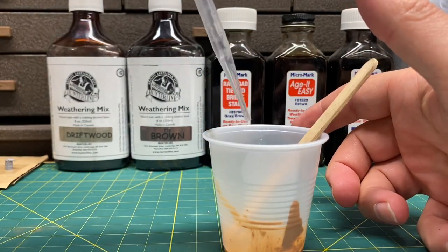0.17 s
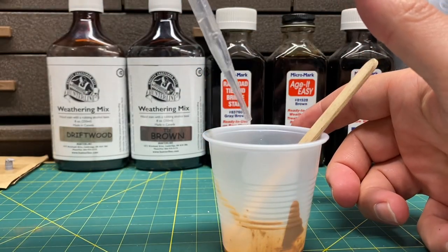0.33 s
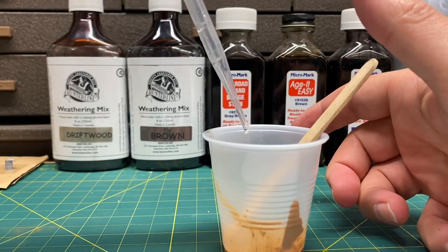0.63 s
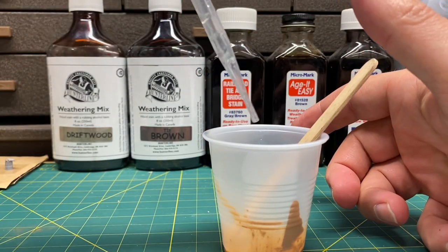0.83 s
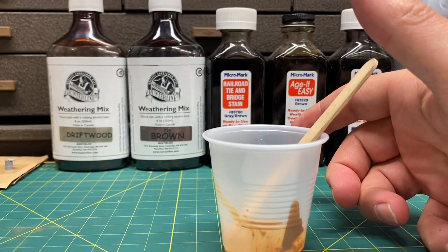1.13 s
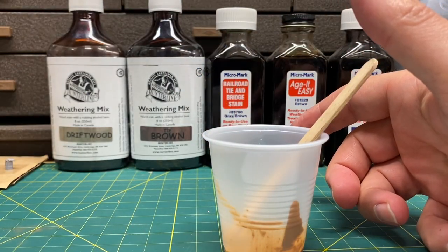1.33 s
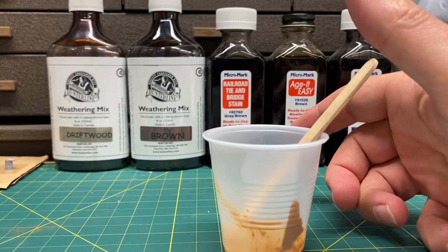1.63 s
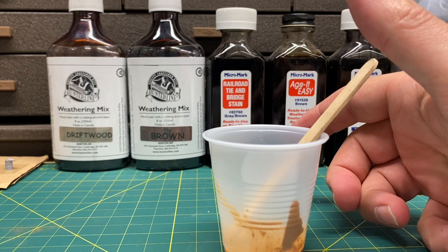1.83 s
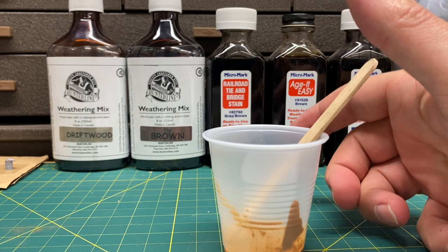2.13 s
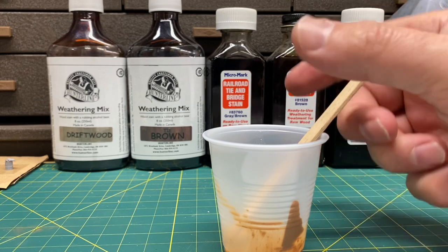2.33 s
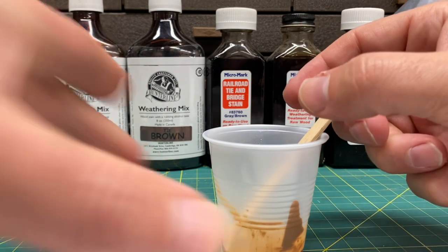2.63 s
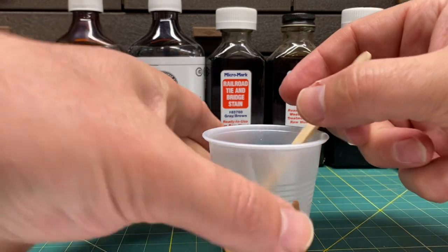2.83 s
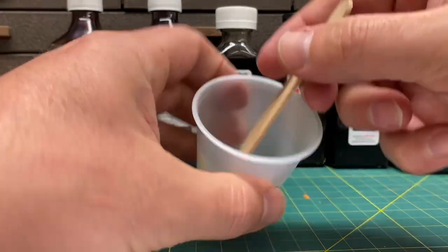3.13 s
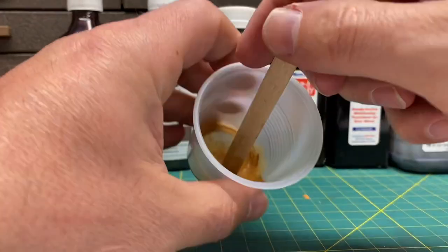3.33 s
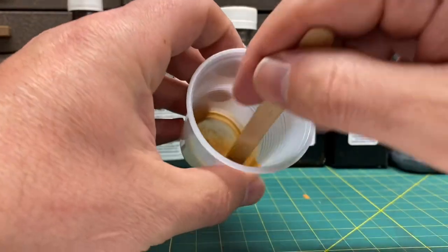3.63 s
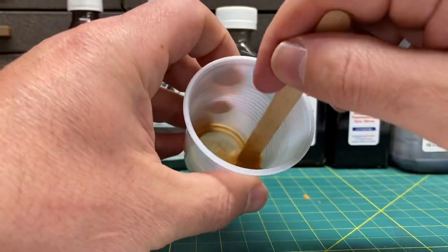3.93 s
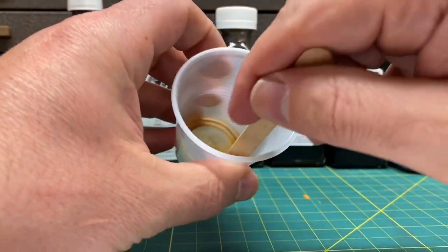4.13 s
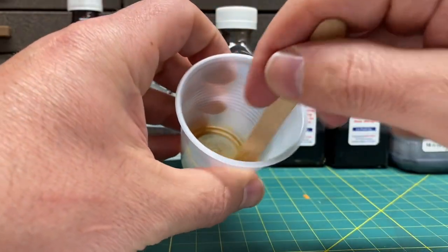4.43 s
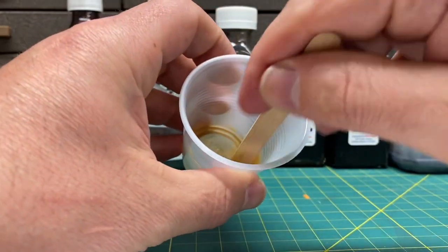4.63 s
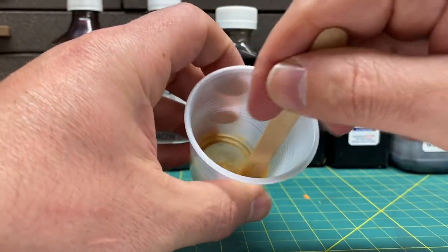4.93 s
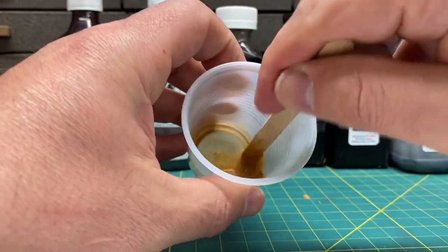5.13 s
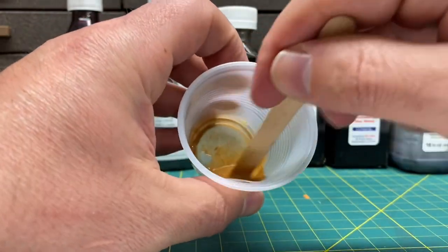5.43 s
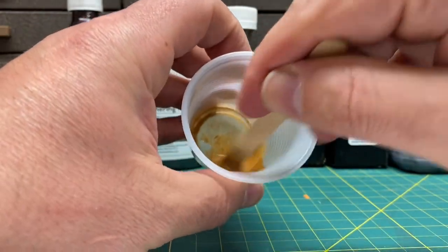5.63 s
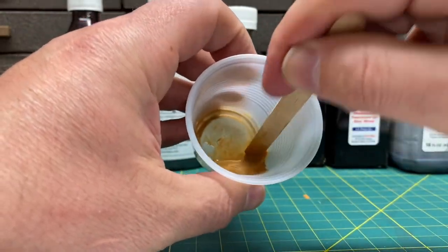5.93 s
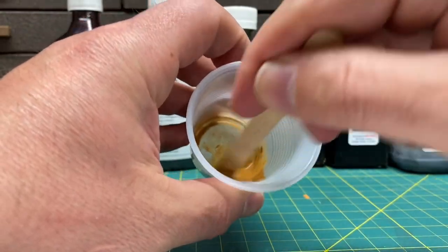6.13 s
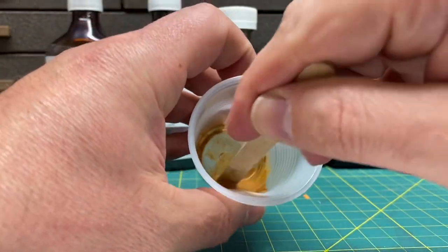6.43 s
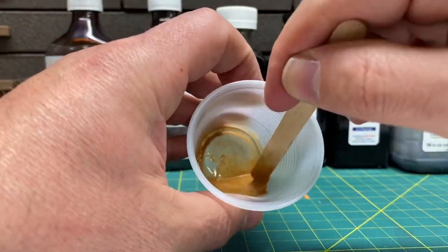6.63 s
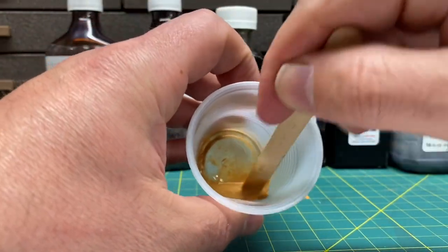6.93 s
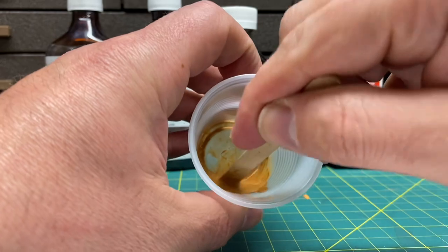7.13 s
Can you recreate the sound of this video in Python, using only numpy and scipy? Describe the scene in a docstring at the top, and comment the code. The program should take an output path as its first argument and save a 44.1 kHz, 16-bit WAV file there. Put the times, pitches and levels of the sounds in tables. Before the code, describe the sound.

A pipette drips and is set down, then a wooden stick scrapes and clicks around a thin plastic cup of paint over a low hum.

```python
"""Stirring paint in a plastic cup

A pipette drips, each drop ringing as a small bubble, and rattles as it is laid on the workbench.
Fingers slide on a thin plastic cup, then a flat wooden stick stirs the watery paint in it, rubbing
along the bottom in gritty strokes and skipping over the ribs of the wall, all close to a phone.
Underneath, a transformer hums at twice the mains frequency over the rumble of the house."""
import sys
import numpy as np
from scipy import signal
from scipy.fft import rfft, irfft, next_fast_len
from scipy.io import wavfile
from scipy.ndimage import uniform_filter1d, map_coordinates

SR = 44100
rng = np.random.default_rng(int(sys.argv[2]) if len(sys.argv) > 2 else 0)


def to_wav(s):
    """Save 16-bit WAV."""
    ch = np.atleast_2d(s).T  # columns
    pcm = np.round(np.clip(ch, -1, 1) * 32767)  # PCM
    wavfile.write(sys.argv[1], SR, pcm.astype(np.int16))


N = 320607

# The transformer's hum and a faint tone above it. Each row: pitch in Hz, rms level in dB.
HUM_TONES = [(119.93, -32.3), (269, -67)]
# The fader ride of the low drone. Each row: time in seconds, level in dB.
DRONE_RIDE = [(0.05, -47.5), (1.54, -58.5), (1.84, -31.5), (2.18, -53), (2.9, -46.5), (3.02, -54),
              (3.18, -48), (3.61, -49), (4.23, -40.5), (4.49, -57), (4.61, -40), (4.81, -54), (5.74, -59),
              (5.98, -45), (6.1, -67), (6.26, -47), (6.4, -65), (7.08, -49)]
# The tone colour of the house rumble. Each row: frequency in Hz, relative level in dB.
RUMBLE_SPECTRUM = [(20, -32.5), (35, -17.5), (55, -10.5), (75, -11), (98, 0), (115, -1), (135, -5),
                   (160, -7.5), (185, -28), (225, -20.5), (270, -27.5), (320, -31.5), (550, -38),
                   (800, -54.5), (1200, -59), (4000, -67), (12000, -72), (14000, -78), (16000, -88.5)]
# How centred the rumble sits. Each row: frequency in Hz, left-right correlation (1 is mono).
RUMBLE_LIKENESS = [(100, 0.98), (300, 0.95), (600, 0.15), (1200, 0.081), (16000, 0.18)]
# Drops from the pipette. Each row: start in seconds, relative peak in dB, spit over that peak in dB.
DROPS = [(0.0102, -38, -29), (0.0214, -63, -39), (0.0275, -60, -29), (0.0496, -55.5, -45.5),
         (0.131, -70, -38), (0.5033, -52, -17), (0.5163, -38, -16), (0.5266, -46.5, -26.5),
         (0.5431, -44, -18), (0.559, -47, -27.5), (0.5721, -50, -21), (0.605, -53, -20.5),
         (0.627, -62.5, -36), (0.6444, -68, -30), (0.6694, -70, -32)]
# The pipette meets the bench. Each row: start in seconds, relative peak in dB, favoured pitch in Hz.
PIPETTE_TAPS = [(0.872, -68.5, 3190), (1.225, -70.5, 800), (1.752, -67, 800), (1.848, -70, 6470),
                (1.886, -42, 1495), (1.914, -50, 2400), (1.948, -58, 3200), (1.96, -45, 6500),
                (1.964, -50, 800), (2.034, -44, 1850), (2.051, -52, 800), (2.094, -57.5, 1500),
                (2.203, -61, 2400), (2.35, -65.5, 3200)]
# The ring of the pipette's tube. Each row: pitch in Hz, width in Hz, gain in dB.
TUBE_MODES = [(796, 150, -0.5), (1522, 32, 5.5), (1850, 24, 1), (2530, 66, -2), (3240, 79, -4),
              (4120, 180, -2.5), (5300, 96, -11), (6600, 300, -12), (7800, 350, -9.5)]
# The colour of skin on plastic. Each row: centre in Hz, width in Hz, gain in dB.
SKIN_BANDS = [(1200, 790, 1.5), (2400, 1700, -0.5), (5040, 2100, -1), (6130, 1200, 1.5)]
# Fingers slide on stick and cup. Each row: start and stop in seconds, relative level in dB,
# swell in dB, fade in dB per second, sizzle over the rub in dB.
GRIPS = [(2.479, 2.518, -68.5, 9.5, 250, -4), (2.544, 2.698, -73, 3.5, 403, -15.5),
         (2.818, 2.869, -65.5, 2, 304, -5), (2.864, 2.881, -60, 4.5, 300, -5),
         (2.884, 2.97, -52.5, -11, 799.5, -5), (3.004, 3.042, -59.5, -11.5, 123, 1),
         (3.149, 3.241, -66, -7, 200, 5.5)]
# The stick skips and knocks. Each row: time in seconds, relative knock peak in dB,
# relative tick level in dB, knock pitch in Hz.
SKIPS = [(2.517, -76, -50.5, 431), (2.822, -40, -39.5, 1910), (2.861, -57, -52, 393),
         (2.883, -55, -41, 463), (3.007, -30, -53.5, 760), (3.236, -55, -67, 594), (3.351, -43, -62, 402),
         (3.51, -50, -45.5, 528), (3.525, -34, -40.5, 574), (3.563, -24, -54, 706), (3.577, -21, -39, 1100),
         (3.585, -22.5, -43, 676), (3.614, -24, -40, 940), (3.779, -38, -36.5, 1300),
         (3.827, -44, -49, 966), (3.86, -30.5, -40.5, 920), (3.878, -39, -41, 500), (3.973, -47, -39, 786),
         (3.986, -30, -39, 770), (4.012, -29, -49, 696), (4.076, -35.5, -46.5, 1220),
         (4.116, -27, -36, 1410), (4.263, -51, -38.5, 1260), (4.29, -29.5, -39, 1220),
         (4.304, -27, -32.5, 1220), (4.325, -53, -41, 436), (4.341, -47, -37.5, 382),
         (4.37, -40, -36.5, 1260), (4.406, -33.5, -33.5, 990), (4.416, -29, -44, 960),
         (4.432, -29.5, -31, 870), (4.448, -25, -36, 1340), (4.472, -23.5, -29.5, 980),
         (4.513, -21.5, -40.5, 1050), (4.572, -39, -51.5, 507), (4.613, -33, -40.5, 1290),
         (4.794, -42.5, -37.5, 845), (4.814, -33, -42, 1210), (4.862, -42, -40.5, 1210),
         (4.92, -25.5, -40.5, 680), (4.928, -20.5, -38, 1090), (4.941, -27, -37.5, 620),
         (4.952, -26, -37, 1380), (4.969, -28, -33.5, 795), (5.065, -28.5, -27.5, 775),
         (5.151, -51, -43.5, 615), (5.167, -37, -36.5, 1120), (5.177, -31, -36, 1130),
         (5.33, -46, -35.5, 605), (5.351, -58, -48.5, 724), (5.387, -48, -46.5, 533),
         (5.403, -52, -45, 500), (5.413, -57, -46.5, 500), (5.423, -44, -46, 401), (5.434, -45, -48.5, 500),
         (5.452, -43.5, -55.5, 497), (5.541, -40, -45, 414), (5.579, -47, -46, 483), (5.605, -47, -49, 500),
         (5.678, -42.5, -50.5, 780), (5.754, -39, -40, 1100), (5.81, -52, -49, 500), (5.823, -52, -60, 500),
         (5.88, -44, -46, 420), (5.91, -34.5, -47.5, 670), (5.926, -34, -47.5, 485),
         (6.027, -36.5, -58.5, 630), (6.05, -39, -43, 1200), (6.187, -38, -51.5, 460),
         (6.322, -32.5, -53, 1190), (6.354, -29.5, -49, 570), (6.37, -29.5, -45.5, 865),
         (6.397, -34, -53.5, 626), (6.438, -46, -39, 603), (6.661, -32.5, -56, 414),
         (6.735, -23.5, -49.5, 500), (6.793, -35.5, -43, 710), (6.97, -28, -59, 720),
         (6.985, -17, -40.5, 1050), (7.006, -23.5, -47.5, 820), (7.042, -40, -53.5, 1180),
         (7.064, -29, -49, 1080), (7.074, -22, -37, 590), (7.116, -28, -43, 1210)]
# A faint rasp as the cup tilts. Each row: start and stop in seconds, relative level in dB,
# swell in dB, fade in dB per second.
TILT_RASPS = [(3.235, 3.5, -70, 1, 1000)]
# The colour of that rasp. Each row: centre in Hz, width in Hz, gain in dB.
RASP_BAND = [(1670, 420, 0)]
# Stirring strokes. Each row: start and turn of the stick in seconds, relative hiss level in dB,
# swell in dB, fade in dB per second, cup body over the hiss in dB, sizzle over the hiss in dB.
STROKES = [(3.349, 3.364, -61.5, 1, 300, 9, 0.5), (3.505, 3.54, -48, 0.5, 298, 5.5, -7.5),
           (3.542, 3.598, -54.5, -2.5, 1500, 13.5, -4.5), (3.613, 3.644, -50, -7.5, 900, 8, -6.5),
           (3.714, 3.851, -55.5, 3, 600, 3, -0.5), (3.972, 3.991, -52.5, 1.5, 2002, 11, -5),
           (4.015, 4.149, -59, 6.5, 500, 3.5, -2), (4.171, 4.168, -53.5, 1.5, 900, -0.5, -6),
           (4.259, 4.416, -53, -3, 1997, 5.5, -1.5), (4.508, 4.515, -49, 8.5, 1802.5, 7.5, -5.5),
           (4.58, 4.59, -55, -5, 298, 7, -5), (4.598, 4.622, -50.5, 7, 547, 3, -5.5),
           (4.75, 4.913, -55, -2.5, 1999, 6.5, -2), (5.067, 5.206, -57, 6, 703, 3.5, -2.5),
           (5.288, 5.393, -55.5, -0.5, 353, 6.5, -4), (5.487, 5.578, -58, 2.5, 344.5, 5.5, -0.5),
           (5.675, 5.73, -56, -1, 200, 6, -1), (5.738, 5.774, -50, 0, 197.5, 4.5, -3),
           (5.87, 5.899, -52.5, -1.5, 200, 3.5, -5), (5.905, 5.975, -55, -0.5, 150, 7.5, -4),
           (6.047, 6.187, -53.5, -0.5, 200, 2, -1.5), (6.24, 6.31, -57, -1, 200, 0.5, 0),
           (6.318, 6.401, -56.5, -1, 300, 10, -3), (6.43, 6.448, -52, -1.5, 399, 5, -4.5),
           (6.46, 6.596, -57.5, 6, 800, 3.5, 0), (6.657, 6.688, -60.5, 4, 2000, 13, -11),
           (6.72, 6.959, -55, -5, 2000, 5, 0), (6.959, 7.02, -54.5, 0, 201, 8.5, -7),
           (7.04, 7.124, -57, 5, 199.5, 8, 0.5), (7.155, 7.273, -59.5, 6, 100, 0.5, 3)]
# The ring of cup and stick. Each row: pitch in Hz, width in Hz, gain in dB.
CUP_MODES = [(219, 97, -5), (429, 176, -6.5), (565, 130, -3.5), (781.4, 39, -1), (956, 150, -7.5),
             (1194, 76, 4), (1317, 138, 2), (1930, 420, -8), (2103, 300, -8.5), (2870, 3400, -19.5),
             (3440, 600, -12), (4725, 565, -9), (6096, 580, -5.5), (7970, 1340, -12), (8660, 670, -16.5),
             (9460, 1400, -11.5), (10830, 770, -23.5), (13600, 2800, -17.5), (15700, 480, -28)]
# The lows belong to the walls, the highs to the rubbed patch, the very top to the stick's edge.
PATCH_FROM_HZ, EDGE_FROM_HZ = 2500, 9000
WALL_MODES = [mode for mode in CUP_MODES if mode[0] < PATCH_FROM_HZ]
PATCH_MODES = [mode for mode in CUP_MODES if PATCH_FROM_HZ <= mode[0] < EDGE_FROM_HZ]
EDGE_MODES = [mode for mode in CUP_MODES if mode[0] >= EDGE_FROM_HZ]
# The room's short tail. Each row: frequency in Hz, seconds to die by 60 dB.
ROOM_DECAY = [(300, 0.21), (2000, 0.29), (6000, 0.17), (10000, 0.13), (15000, 0.04)]
# The phone's stereo balance. Each row: frequency in Hz, left over right in dB.
LEFT_TILT = [(100, 0), (250, 0), (700, 3), (1300, 1), (2500, 3.5), (5000, 3), (7500, 1.5), (9000, -0.5),
             (16000, 0)]
# The phone's stereo phase. Each row: frequency in Hz, lead of the right side in radians.
RIGHT_LEAD = [(0, 0), (250, -.04), (1000, -.25), (1400, -3.1), (1750, -6.3), (3000, -7.7), (5000, -6.7),
              (6700, -6.3), (8400, -3.1), (9800, -.2), (10700, .2), (12200, 3.1), (13700, 6.1),
              (14500, 6.5), (15800, 9.4)]


def amp(db):
    """Gain of a level in dB."""
    return 10 ** (np.asarray(db) / 20)


def unit(x):
    """The signal scaled to rms 1."""
    return x / np.sqrt(np.mean(x ** 2) + 1e-20)


def along(points, hz):
    """A curve through (Hz, value) points on a log frequency axis."""
    knots_hz, values = np.transpose(points)
    return np.interp(np.log(hz + 1), np.log(knots_hz + 1), values)


def wobble(rate):
    """A smooth random curve with `rate` knots a second."""
    knots = rng.standard_normal(int(N * rate / SR) + 4)
    return map_coordinates(knots, [np.arange(N) * rate / SR])


def filtered(x, response):
    """The signal through a complex frequency response."""
    size = next_fast_len(x.shape[-1] + 8192)
    hz = np.fft.rfftfreq(size, 1 / SR)
    return irfft(rfft(x, size) * response(hz), size)[..., :x.shape[-1]]


def modes(table):
    """Response of a bank of resonances, alternating in polarity."""
    return lambda f: sum((-1) ** k * amp(db) * 1j * f * width / (hz * hz - f * f + 1j * f * width)
                         for k, (hz, width, db) in enumerate(table))


def scattered(table, spread_db):
    """The same modes at new strengths: every blow lands elsewhere."""
    return modes([(hz, width, db + spread_db * rng.standard_normal()) for hz, width, db in table])


def add(track, start, peak_db, sound):
    """Mix a short sound in at `start` seconds with the given peak."""
    part = track[round(start * SR):][:len(sound)]
    part += amp(peak_db) * sound[:len(part)] / np.abs(sound).max()


def patchy(x, depth_db):
    """Restless colour: random gain in patches of about 500 Hz by 40 ms."""
    spectra = signal.stft(x, nperseg=256)[2]
    field = uniform_filter1d(rng.standard_normal(spectra.shape[-2:]), size=3, axis=0)
    field = uniform_filter1d(field, size=12, axis=1)
    return signal.istft(spectra * amp(depth_db * unit(field)), nperseg=256)[1][..., :N]


def burst(t, t60, rise_s=0.0015):
    """Envelope with a quick attack and a decay of 60 dB in t60 seconds."""
    return amp(-60 * t / t60) * (1 - np.exp(-t / rise_s))


def rub_envelope(start, stop, level_db, swell_db, fade_db_per_s, rise_s=0.004):
    """Gain of one rub: it rises, swells or sags evenly until the stop, then fades."""
    t = np.arange(N) / SR - start
    held = max(stop - start, 1 / SR)
    db = level_db + swell_db * np.clip(t / held, 0, 1) - fade_db_per_s * np.clip(t - held, 0, 1)
    return np.clip(t / rise_s, 0, 1) ** 2 * amp(db)


def widened(noise_pair, table, width=0.35):
    """Two noises ring the same modes and become the mid and side of a narrow stereo pair."""
    mid, side = map(unit, filtered(noise_pair, modes(table)))
    return np.array([mid + width * side, mid - width * side]) / np.hypot(1, width)


def transformer_hum():
    """A steady tone at twice the mains frequency, with a faint higher one."""
    t = np.arange(N) / SR
    return sum(amp(db) * np.sqrt(2) * np.sin(2 * np.pi * hz * t) for hz, db in HUM_TONES)


def low_drone(hz=61.7):
    """A deep tone under the hum that wavers in level and pitch."""
    t = np.arange(N) / SR
    level_db = np.interp(t, *np.transpose(DRONE_RIDE)) + wobble(21)
    return amp(level_db) * np.sqrt(2) * np.sin(2 * np.pi * hz * t + 0.43 * wobble(5))


def house_rumble():
    """A bed of dark noise, near mono in the bass and wide above it."""
    def mid_and_side(hz):
        angle = np.arccos(along(RUMBLE_LIKENESS, hz)) / 2
        return amp(along(RUMBLE_SPECTRUM, hz)) * [np.cos(angle), np.sin(angle)]

    mid, side = filtered(rng.standard_normal((2, N)), mid_and_side)
    return unit(np.array([mid + side, mid - side]))


def pipette_drops(bubble_hz=1350):
    """Each drop rings as a small rising bubble, with a wet gurgle and a bright spit."""
    out, t = np.zeros(N), np.arange(4000) / SR
    gurgle_bands = modes([(1370, 990, -11.5), (2600, 440, -10.0)])
    spit_bands = modes([(4830, 1600, 7), (7600, 750, -3.5)])
    for start, db, spit_db in DROPS:
        hz = bubble_hz * np.exp(0.05 * rng.standard_normal())
        noise = rng.standard_normal(len(t))
        bubble = np.sin(2 * np.pi * hz * t * (1 + 3 * t)) * burst(t, t60=0.013)
        gurgle = filtered(filtered(noise, gurgle_bands), gurgle_bands) * burst(t, t60=0.019)
        spit = filtered(noise, spit_bands) * burst(t, t60=0.039, rise_s=0.00082)
        add(out, start, db, bubble + 3.8 * gurgle)
        add(out, start, db + spit_db, spit)
    return out


def pipette_rattle():
    """The light tube rings at each touch on the bench, and skin rustles as the fingers let go."""
    out, t = np.zeros(N), np.arange(4000) / SR
    for start, db, spot_hz in PIPETTE_TAPS:
        tube = scattered(TUBE_MODES, spread_db=2)
        spot = modes([(spot_hz, 0.35 * spot_hz, 9)])
        touch, rustle = rng.standard_normal((2, len(t)))
        tap = filtered(amp(-60 * t / 0.0085) * touch, lambda f: tube(f) * (1 + spot(f)))
        release = filtered(amp(-60 * t / 0.12) * rustle, modes(SKIN_BANDS))
        add(out, start, db, tap)
        add(out, start, db - 11.5, release)
    return out


def finger_grips():
    """Skin slides on stick and cup: soft, smooth friction with a sizzle on top."""
    rub_gain, sizzle_gain = np.zeros((2, N))
    for start, stop, db, swell_db, fade, sizzle_db in GRIPS:
        rub_gain += rub_envelope(start, stop, db, swell_db, fade)
        sizzle_gain += rub_envelope(start, stop, db + sizzle_db, 0.99 * swell_db, fade)
    friction = patchy(amp(1.6 * wobble(110)) * rng.standard_normal(N), depth_db=3.1)
    rub = unit(filtered(friction, modes(SKIN_BANDS)))
    sizzle = unit(filtered(friction, modes(EDGE_MODES)))
    return rub_gain * rub + sizzle_gain * sizzle


def stick_skips():
    """Each rib gives a short burst of friction: a knock that rings the walls and a treble tick."""
    out, t = np.zeros(N), np.arange(3000) / SR
    for time, knock_db, tick_db, knock_hz in SKIPS:
        contact_s = 0.00326 * np.exp(0.13 * rng.standard_normal())
        tick_hz = 5100 * np.exp(0.3 * rng.standard_normal())
        age = t / contact_s
        scuff, scratch = rng.standard_normal((2, len(t)))

        flex = np.sin(2 * np.pi * knock_hz * t) * (knock_hz * t < 1)  # the struck spot flexes once
        spot = modes([(knock_hz, 0.9 * knock_hz, 0)])  # and favours the modes near its pitch
        blow = filtered(flex + 4 * scuff * age * np.exp(-1.8 * age), spot)
        knock = filtered(blow, scattered(WALL_MODES, spread_db=2.5))
        add(out, time - 0.0005, knock_db, knock)

        treble = scattered(PATCH_MODES + EDGE_MODES, spread_db=2.5)
        lift = modes([(tick_hz, 0.15 * tick_hz, 3)])
        scrape = scratch * age ** 1.71 * np.exp(-2.2 * age)
        tick = filtered(scrape, lambda f: treble(f) * (1 + lift(f)))
        add(out, time - 0.0015, tick_db + 4, tick)  # a tick peaks 4 dB over its level
    return out


def tilt_rasp():
    """A faint, narrow band of rough noise while the cup tilts."""
    noise = patchy(rng.standard_normal(N), depth_db=1.5)
    rasp = filtered(noise, lambda f: modes(RASP_BAND)(f) ** 2)
    return sum(rub_envelope(*row) for row in TILT_RASPS) * unit(rasp)


def stirring_strokes(grit_db=0.65, patchy_db=3.5):
    """Wood drags on wet plastic: gritty, juddering noise that bites at once and dies at each turn."""
    hiss_gain, body_gain, sizzle_gain = np.zeros((3, N))
    for *stroke, body_db, sizzle_db in STROKES:
        gain = rub_envelope(*stroke, rise_s=0.00093)
        hiss_gain = np.maximum(hiss_gain, gain)
        body_gain = np.maximum(body_gain, gain * amp(body_db))
        sizzle_gain = np.maximum(sizzle_gain, gain * amp(sizzle_db))
    judder_db = 1.5 * wobble(90)  # stick and slip, felt by the whole cup
    snags = fibre_snags(per_second=60, spread_db=2.5, rise_ms=1.5)
    grit = snags * amp(grit_db * rng.exponential(size=N)) * rng.standard_normal((2, N))
    friction = patchy(amp(judder_db + 0.34 * wobble(300)) * grit, patchy_db)  # the contact keeps shifting
    hiss = hiss_gain * widened(friction, PATCH_MODES)
    sizzle = sizzle_gain * widened(friction, EDGE_MODES)

    push = amp(2.1 * judder_db + 1.3 * wobble(150)) * rng.standard_normal(N)
    push = patchy(push, 1.49 * patchy_db)
    walls = modes(WALL_MODES)
    body = filtered(body_gain * push, walls) / np.std(filtered(push, walls))
    return hiss + sizzle + body


def fibre_snags(per_second, spread_db, rise_ms):
    """Gain that jumps where wood fibres catch and let go."""
    age = np.arange(400) / (rise_ms * SR / 1000)
    catches = (rng.random(N) < per_second / SR) * amp(spread_db * rng.exponential(size=N))
    return 1 + 0.56 * signal.fftconvolve(catches, age * np.exp(1 - age))[:N]


def room_echo(x, predelay=SR // 200):
    """The room answers after 5 ms with a noise tail on each side; the top end dies first."""
    hz, t, spectra = signal.stft(rng.standard_normal((2, SR // 3)), SR, nperseg=128)
    decay = amp(-60 * t / along(ROOM_DECAY, hz)[:, None])
    tail = signal.istft(spectra * decay, SR, nperseg=128)[1]
    delayed = np.pad(x, (predelay, 0))[None]
    return signal.fftconvolve(delayed, tail / np.linalg.norm(tail[0]), axes=1)[:, :N]


def scene():
    """Close bench sounds and a touch of room over a bed of hum, drone and rumble."""
    bench = stirring_strokes() + stick_skips() + finger_grips() + tilt_rasp()
    bench += pipette_drops() + pipette_rattle()
    room = room_echo(bench.mean(axis=0))
    bed = transformer_hum() + low_drone() + amp(-41.5) * house_rumble()
    return amp(1.5) * bench + amp(-17.5) * room + bed


def record(dry):
    """The phone spreads the stereo image by level and phase, and cuts all above its band limit."""
    sides, top_hz = np.array([[-0.5], [0.5]]), 15800

    def phone(hz):
        balance = amp(-sides * along(LEFT_TILT, hz))
        phase = sides * np.interp(hz, *np.transpose(RIGHT_LEAD))
        return balance * np.exp(1j * phase) * (hz < top_hz)

    return filtered(dry, phone)


dry = scene()
out = record(dry)
to_wav(out)
```